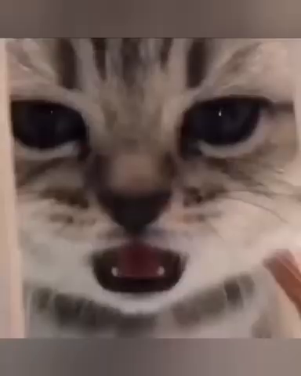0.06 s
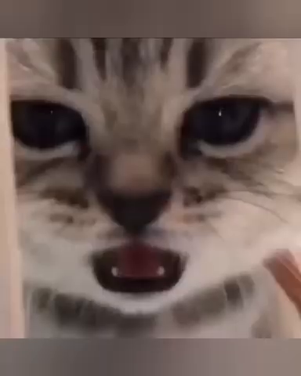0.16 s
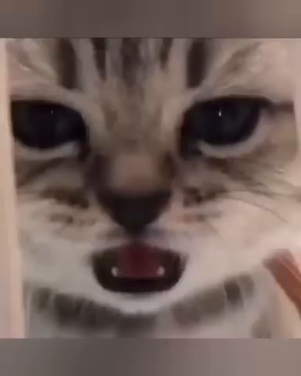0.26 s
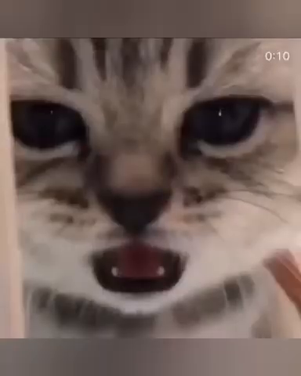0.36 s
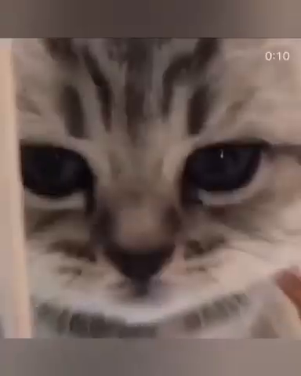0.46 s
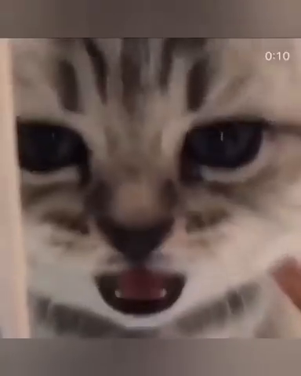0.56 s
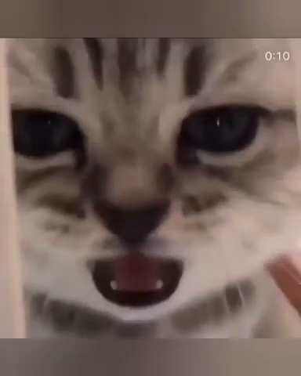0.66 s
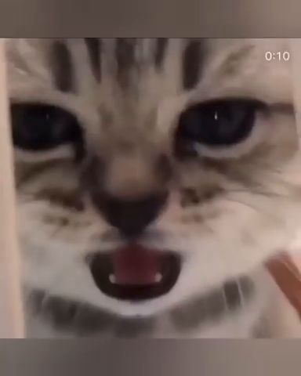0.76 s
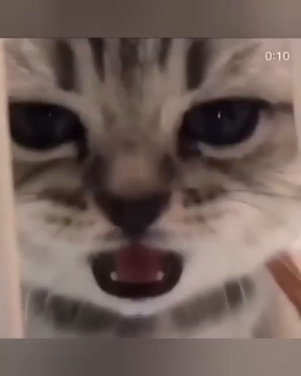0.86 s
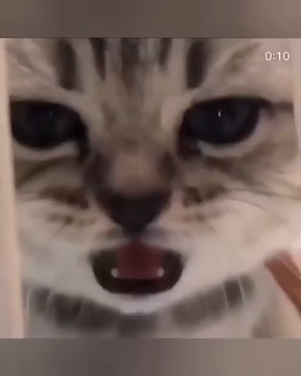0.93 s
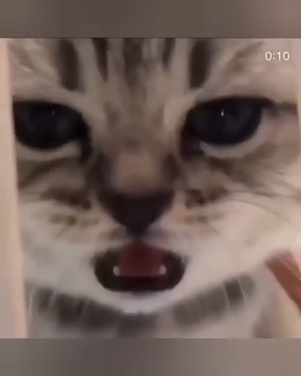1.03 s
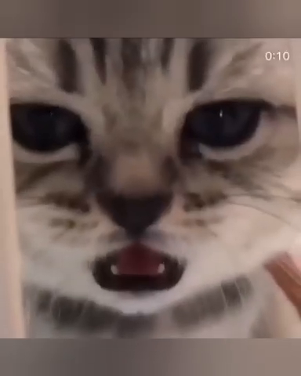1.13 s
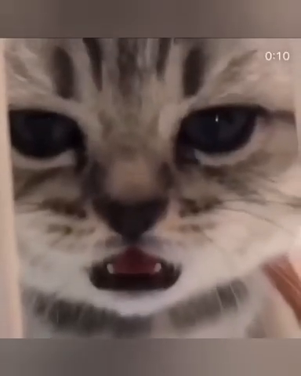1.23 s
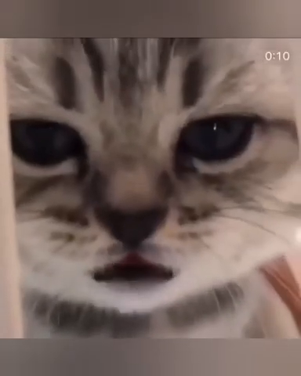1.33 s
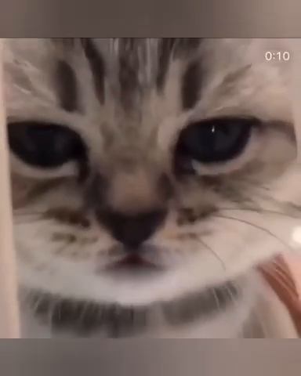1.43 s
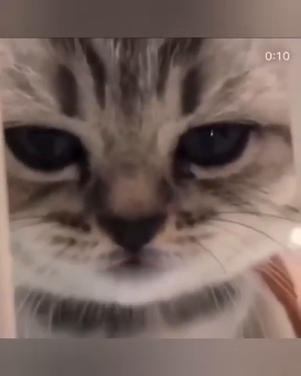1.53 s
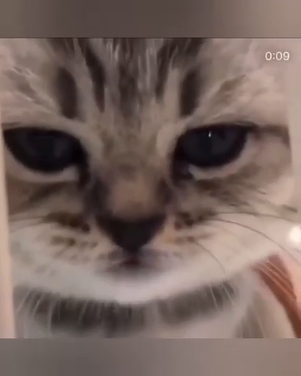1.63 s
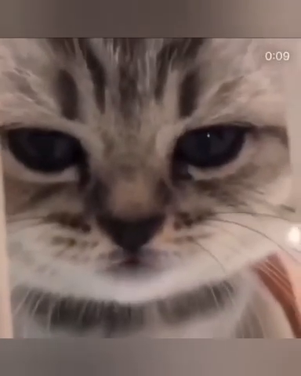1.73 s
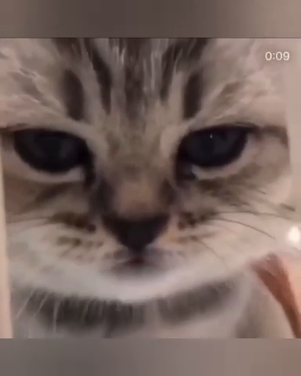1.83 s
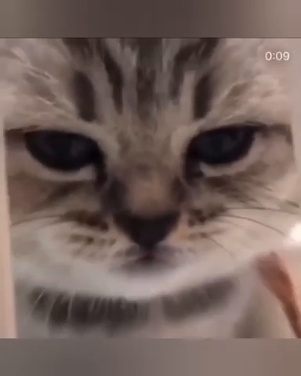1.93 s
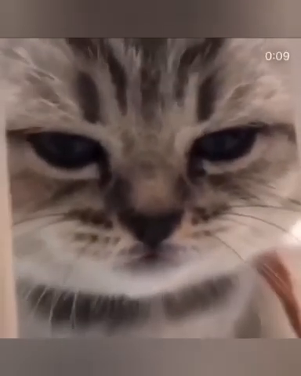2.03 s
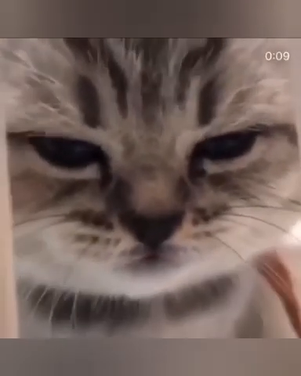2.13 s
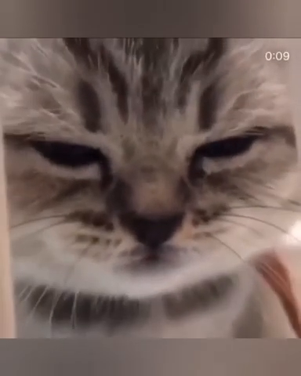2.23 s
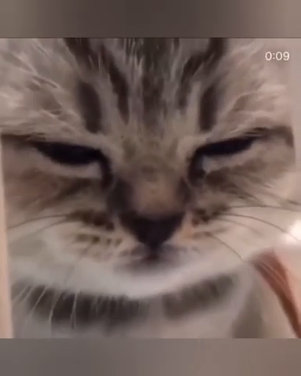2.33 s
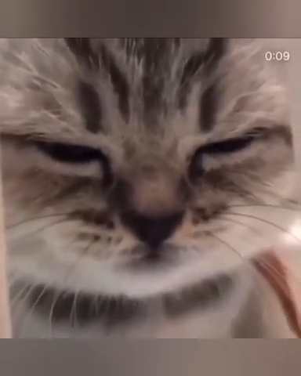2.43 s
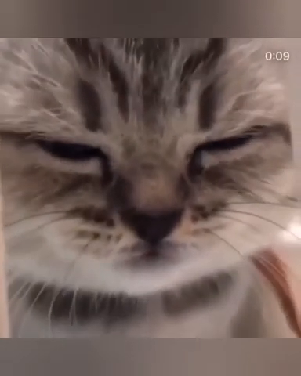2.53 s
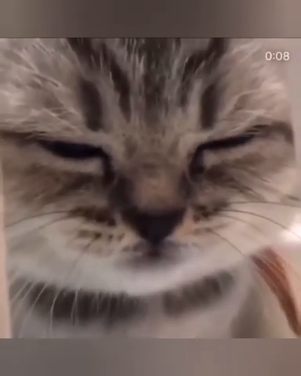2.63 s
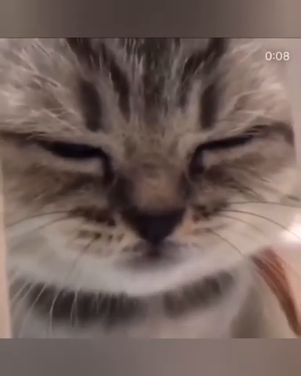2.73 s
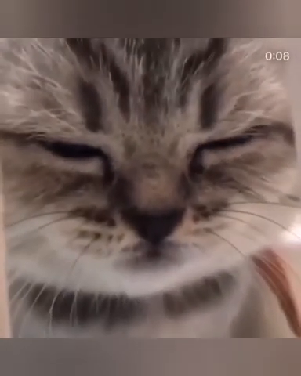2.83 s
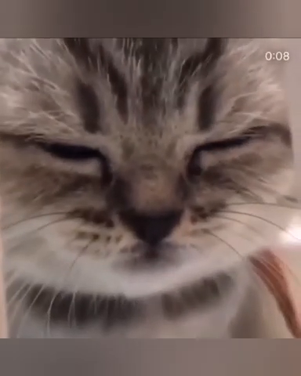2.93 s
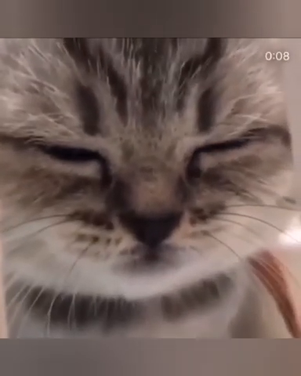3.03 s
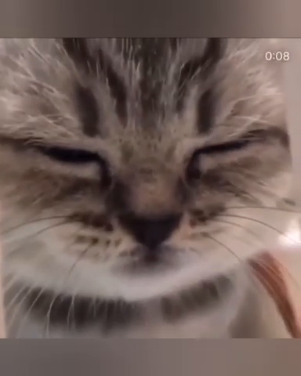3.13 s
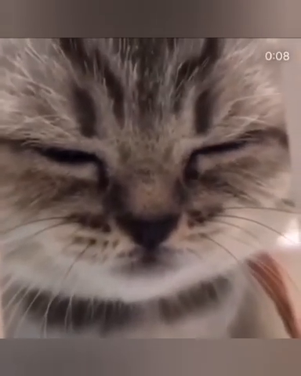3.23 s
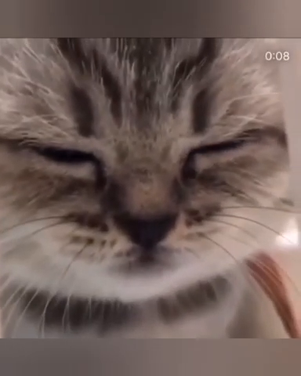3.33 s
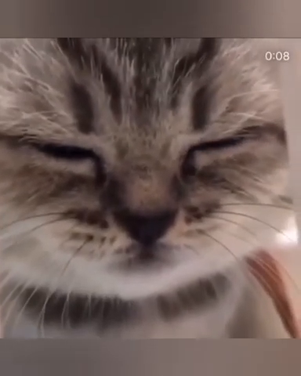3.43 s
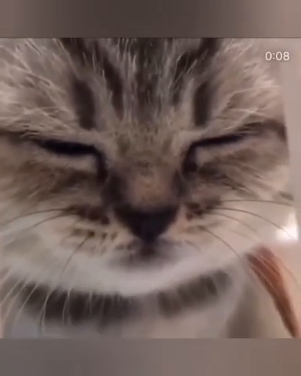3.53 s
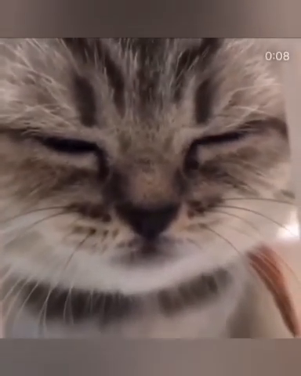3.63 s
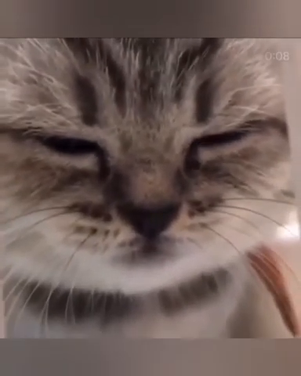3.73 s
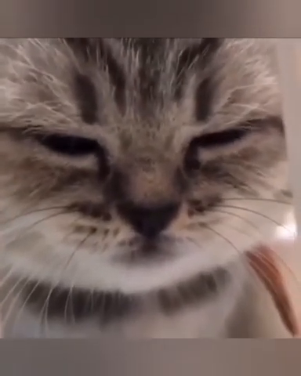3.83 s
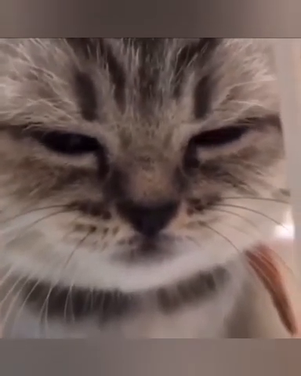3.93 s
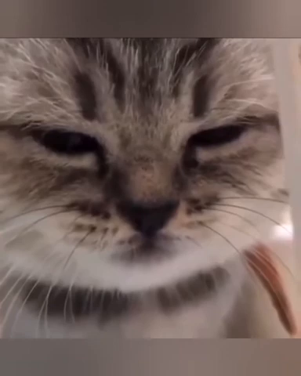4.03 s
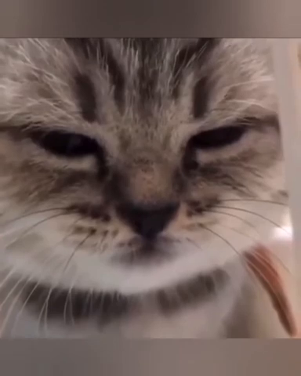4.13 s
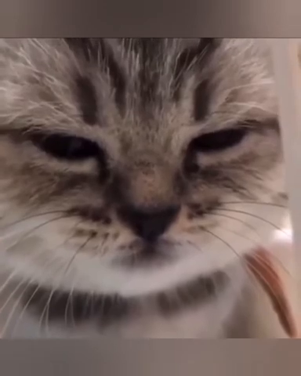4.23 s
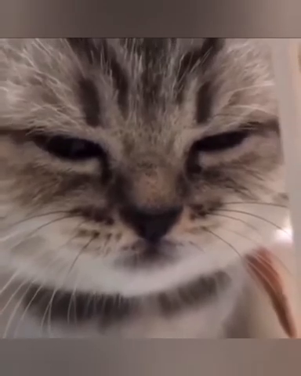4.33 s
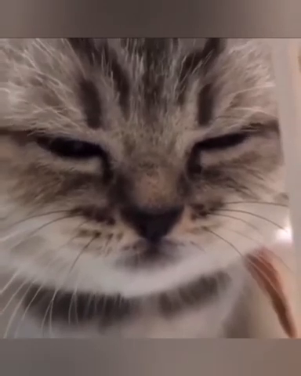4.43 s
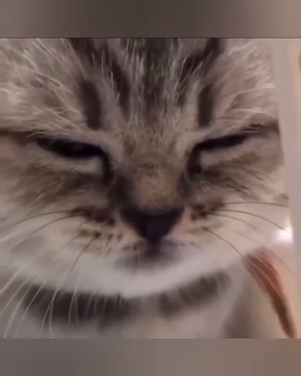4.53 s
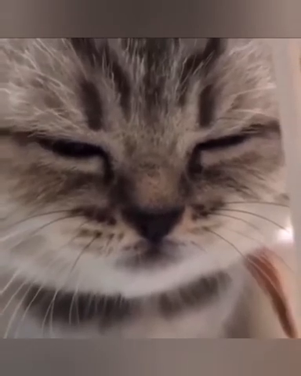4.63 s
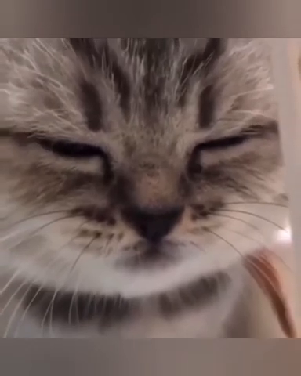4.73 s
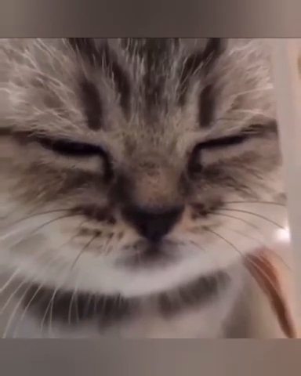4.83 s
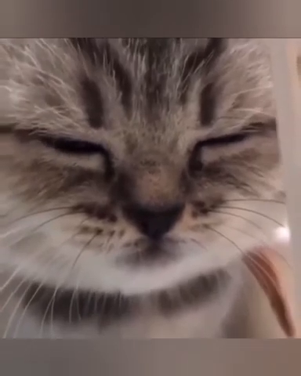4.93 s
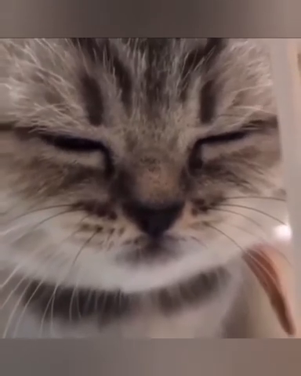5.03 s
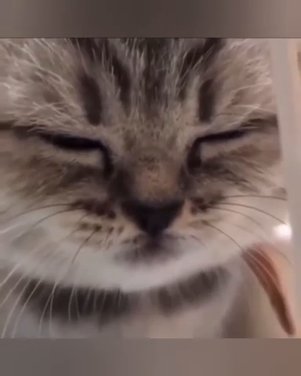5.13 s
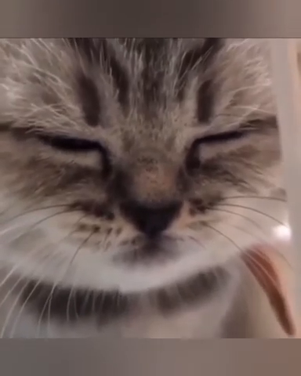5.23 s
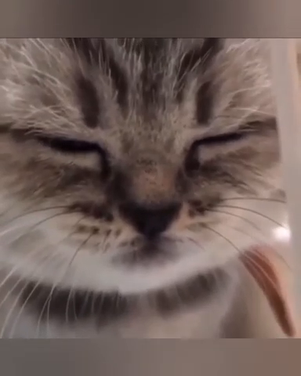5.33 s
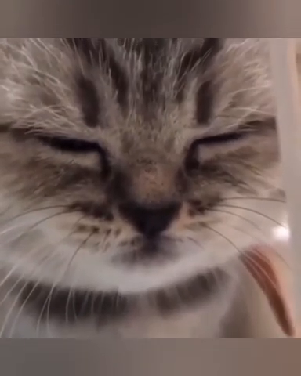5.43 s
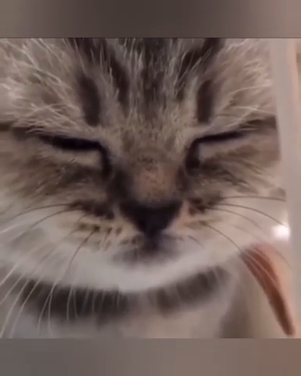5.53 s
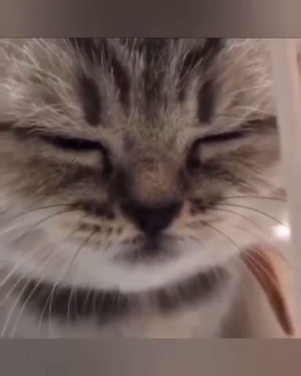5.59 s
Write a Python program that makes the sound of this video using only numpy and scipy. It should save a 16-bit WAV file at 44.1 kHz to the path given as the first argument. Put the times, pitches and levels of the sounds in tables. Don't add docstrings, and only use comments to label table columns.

```python
import sys
import numpy as np
from scipy import signal
from scipy.fft import rfft, irfft
from scipy.io import wavfile
from scipy.ndimage import uniform_filter1d, minimum_filter1d

SR = 44100
rng = np.random.default_rng(int(sys.argv[2]) if len(sys.argv) > 2 else 0)


def gain_from_db(level_db):
    decades = np.asarray(level_db, float) / 20
    return 10 ** decades


def digitize_waveform(pressure):
    field = np.atleast_2d(pressure).T
    bounded = np.clip(field, -1, 1)
    quanta = np.round(bounded * 32767).astype(np.int16)
    wavfile.write(sys.argv[1], SR, quanta)


N = 249606
SWITCH_ON_S = 0.5615

# time_s, pitch_hz, level_db, mouth_opening [about 0-1], effort_db [strength of high partials]
FIRST_MEW = [(.563, 1326, -37.5, 0.76, -18.5), (.605, 1266, -38.5, 0.42, -24.5),
             (.658, 1204, -38.5, .35, -32.5), (.673, 1193, -46, 0.93, -8.5), (.693, 1161, -40.5, 0.21, -30),
             (.893, 1121, -43, 0.48, -11.5), (.933, 1080, -46.5, .4, -32.5), (.988, 993, -45.5, 0.2, -44.5),
             (1.053, 674, -57, 0, -43)]
SECOND_MEW = [(.636, 926, -44, 0.35, -29), (.664, 1149, -37, 0.87, -4.5), (0.673, 1185, -40, 1.3, 3),
              (0.698, 1261, -36.5, 0.55, -3.5), (0.835, 1362, -33.5, 0.59, -4),
              (0.984, 1312, -36.5, 0.46, -4), (1.153, 1169, -36, 0.37, -6), (1.269, 1006, -39, 0.41, -17.5),
              (1.31, 883, -40.5, 0.42, -34.5)]
SECOND_SQUEAK = [
    (1.315, 874, -41.5, 0.13, -31),
    (1.347, 1165, -44.5, 0.15, -9.5),
    (1.365, 1200, -40, .1, 21),
]
THIRD_CROAK = [
    (1.535, 613, -67, 0.033, -25),
    (1.557, 619, -52, 0.058, -16),
    (1.58, 652.6, -54, 0.12, -10),
]
THIRD_MEW = [(1.606, 921, -63, 0.24, -16), (1.63, 1048, -59, 0.27, -1.5), (1.685, 1239, -56, 0.74, -6.5),
             (1.759, 1311, -50.5, 0.86, -6.5), (1.812, 1293, -49.5, 0.88, -12.5),
             (1.924, 1156, -57, 0.58, -12.5), (2.075, 1075, -52, 0.3, -21.5),
             (2.232, 941, -57.5, 0.32, -16.5)]
THIRD_SWELL = [(2.38, 978, -56, 0.37, -15), (2.488, 1054, -52, 0.47, -20.5),
               (2.538, 1112, -50.5, 0.66, -18.5), (2.687, 1075, -52, 0.65, -6.5),
               (2.905, 1051, -50.5, 0.62, -7.5), (2.961, 966, -54.5, 0.5, -12), (2.99, 904, -57, 0.28, -8),
               (3.016, 791, -57, 0.32, -2), (3.048, 612, -52, -0.59, -21)]
FOURTH_MEW = [(3.472, 595.5, -55.5, 0.16, -14), (3.526, 885, -57.5, 0.28, -8), (3.549, 1043, -55.5, .6, -1),
              (3.59, 1141, -54, 0.77, -2.5), (3.648, 1210, -51.5, .7, -2.5),
              (3.782, 1135, -46.5, 0.88, -12), (3.982, 1089, -53.5, 0.7, -7.5), (4.034, 953, -60, 0.26, -3),
              (4.088, 706, -54.5, -0.2, -11.5)]
FIFTH_CROAK = [
    (4.645, 421.5, -54, .05, -21),
    (4.673, 535, -48.5, .15, -8.5),
    (4.683, 632, -49, .2, -5.5),
    (4.702, 601.5, -52, 0.23, 0.5),
    (4.712, 727, -67, .02, -1),
]
FIFTH_MEW = [(4.727, 952, -59, .1, 4), (4.768, 1074, -58.5, 0.5, 2), (4.844, 1179, -54.5, 0.72, 0.5),
             (4.91, 1187, -52.5, 0.67, -7.5), (4.965, 1152, -51, 0.73, -9), (5.131, 1100, -53, 0.65, -10.5),
             (5.46, 1017, -53, 0.57, -9.5), (5.579, 963, -54, 0.46, -8), (5.655, 880, -58, 0.34, -3)]
MEWS = (FIRST_MEW, SECOND_MEW + SECOND_SQUEAK, THIRD_CROAK + THIRD_MEW + THIRD_SWELL,
        FOURTH_MEW, FIFTH_CROAK + FIFTH_MEW)


def mew(rows):
    # pitch_hz, level_db
    mouth = [(2500, 6), (3600, 12), (4500, -2.5), (5700, 5), (6600, -1.5), (7400, -11.5), (8200, -8),
             (9200, -30.5), (10500, -13.5), (12000, -14), (13500, -14.5)]
    time_s, *columns = np.transpose(rows)
    t = np.arange(time_s[0], time_s[-1], 1 / SR)
    hz, *controls = (uniform_filter1d(np.interp(t, time_s, column), 300) for column in columns)
    hz = uniform_filter1d(hz, size=600)
    first_db, second_db, third_db, high_db = partials_db(hz, *controls)
    high_db = np.minimum(high_db, np.maximum(second_db, third_db) + 8)

    glide = uniform_filter1d(abs(np.gradient(np.log(hz))) * SR, 900)
    glide = np.minimum(glide, 6)
    jitter = (0.002 + 0.002 * glide) * drift(len(t), 300)
    wobble = 0.0041 * drift(len(t), 40)
    turns = np.cumsum(hz * (1 + wobble + jitter)) / SR

    order = np.arange(4, 19)[:, None]
    slack_db = 2.1 * np.clip((950 - hz) / 300, 0, 1) + 0.32 * glide
    high = gain_from_db(read(mouth, order * hz) - slack_db * order)
    high *= order * hz < 13400
    high *= gain_from_db(high_db) / np.sqrt((high ** 2).sum(0))

    size = np.vstack([gain_from_db(first_db), gain_from_db(second_db), gain_from_db(third_db), high])
    shimmer = np.array([gain_from_db(1.9 * drift(len(t), 25)) for _ in size])
    phase = 2 * np.pi * (np.arange(1, 19)[:, None] * turns + 0.38 * rng.random((18, 1)))
    tone = np.sqrt(2) * (size * shimmer * np.cos(phase)).sum(0)
    rise_s = 0.002 if time_s[0] < SWITCH_ON_S + 0.01 else 0.012
    fade = np.minimum((t - time_s[0]) / rise_s, (time_s[-1] - t) / 0.012)
    return time_s[0], tone * np.clip(fade, 0, 1)


def partials_db(hz, level_db, opening, effort_db):
    throat_hz = 1000 + 2500 * opening
    climb = np.minimum(throat_hz / hz, 3.2) - 2.25
    nose_db = 8 * np.exp(-((2 * hz - 1250) / 170) ** 2)
    second_db = 1 + 8.5 * climb + nose_db
    third_db = -3.5 + 27.5 * climb
    low_db = np.array([0 * hz, second_db, third_db])
    low_db = low_db + level_db - 10 * np.log10((gain_from_db(low_db) ** 2).sum(0))
    return (*low_db, level_db + effort_db)


def breath():
    # pitch_hz, level_db [dB per Hz]
    air_colour = [(400, -41.5), (1000, -2), (2000, 0), (3200, 3.5), (5000, 0.5), (7000, 0), (9000, -5),
                  (11500, -0.5), (13500, -46.5)]
    level_db, hz = air_flow(np.arange(N) / SR)
    air = coloured(N, air_colour)
    fizz = signal.sosfilt(signal.butter(4, 7500, "high", fs=SR, output="sos"), air)
    air = air + fizz * (gain_from_db(7.3 * drift(N, 29)) - 1)

    turn = np.exp(2j * np.pi * np.cumsum(hz) / SR)
    r = np.exp(-np.pi * 900 / SR)
    whistle = 2 * (turn * signal.lfilter([1 - r], [1, -r], air / turn)).real
    flicker_db = 2.2 * drift(N, 90)
    return gain_from_db(level_db + flicker_db) * evened(air + 2.0 * whistle)


def air_flow(t):
    # peak_s, rise_db_per_s, fall_db_per_s, level_db, resonance_hz
    puffs = [(.6, 159.5, 124, -50.5, 3760), (.666, 92, 195, -44.5, 6350), (1.359, 907, 252, -47, 5340),
             (.95, 40, 18.5, -57, 5510), (1.67, 152, 300, -63, 5670), (2.49, 47.5, 126, -69.5, 5690),
             (2.921, 138, 96, -70, 5890), (3.04, 202, 401, -70.5, 5500), (3.537, 265, 124.5, -60, 6000),
             (4.069, 201, 220.5, -72, 4510), (4.678, 897, 147.5, -60.5, 5000),
             (4.744, 250, 148.5, -64, 6500)]
    # start_s, length_s, level_db, resonance_hz
    sniffs = [
        (1.471, 0.037, -39.5, 7030),
        (3.368, .07, -63.5, 2690),
    ]
    parts = []
    for rows in MEWS:
        time_s, _, level_db, *_ = np.transpose(rows)
        leak_db = -28 + np.interp(t, time_s, level_db, left=-140, right=-140)
        parts.append((leak_db, 5500))
    for peak_s, rise, fall, level_db, hz in puffs:
        drop_db = np.maximum(rise * (peak_s - t), fall * (t - peak_s))
        parts.append((level_db - drop_db, hz))
    for start_s, length_s, level_db, hz in sniffs:
        fall_db = 136 * (t - start_s) + 2200 * np.maximum(t - start_s - length_s, 0)
        parts.append((level_db - np.maximum(3000 * (start_s - t), fall_db), hz))
    power = np.array([gain_from_db(np.maximum(db, -140)) ** 2 for db, _ in parts])
    total = power.sum(0)
    return 10 * np.log10(total), np.array([hz for _, hz in parts]) @ power / total


def knock(start_s, peak_db, hz, bright_db, crack_db):
    # pitch_hz, level_db, t60_s [time to die by 60 dB]
    upper_modes = [(4153, -8, 0.0081), (5643, 1, 0.0031), (7730, -24.5, 0.025), (10250, -22.5, 0.014),
                   (11200, -29, 0.015)]
    # pitch_hz, level_db [dB per Hz]
    crack_colour = [(150, -25.5), (500, 5.5), (2000, 2), (6000, -4.5), (13000, -17)]
    t = np.arange(2500) / SR
    t60 = 0.0016 + 9.9 / hz
    ring = gain_from_db(-60 * t / t60) * np.sin(2 * np.pi * hz * t)
    for mode_hz, mode_db, mode_t60 in upper_modes:
        ring += gain_from_db(bright_db + mode_db - 60 * t / mode_t60) * np.sin(2 * np.pi * mode_hz * t)
    ring += gain_from_db(crack_db - 60 * t / (1.8 * t60)) * coloured(len(t), crack_colour)
    ring *= (1 - np.exp(-t / 0.00082)) ** 2
    return start_s, gain_from_db(peak_db) * ring / abs(ring).max()


def room(x):
    # pitch_hz, t60_s
    echo_length = [(300, 0.3), (2000, 0.44), (8000, 0.46)]
    taps = np.zeros(SR // 2)
    at = np.arange(200, len(taps) - 20, 20)
    taps[at + rng.integers(0, 20, len(at))] = rng.choice([-1., 1.], len(at))
    hz, t, z = signal.stft(taps, SR, nperseg=256)
    t60 = np.clip(read(echo_length, hz), 0.05, 1)[:, None]
    tail = signal.istft(z * gain_from_db(-60 * t / t60), SR, nperseg=256)[1]
    return signal.fftconvolve(x, tail / np.linalg.norm(tail))[:N]


def hum():
    # pitch_hz, level_db [dB per Hz]
    hum_colour = [(20, -45.5), (36, -19), (48, -19.5), (66, -1.5), (100, -7), (137, -5.5), (200, -11),
                  (300, -13), (480, -19.5), (630, -19.5), (1200, -24.5), (3000, -36.5), (6400, -49.5),
                  (11000, -45.5)]
    t = np.arange(N) / SR
    level_db = -63.5 + 14 * np.clip(0.5 - (t - 1.53) / 0.041, 0, 1)
    level_db += 3 * np.exp(-((t - 2.85) / 0.45) ** 2)
    return gain_from_db(level_db + 2.4 * drift(N, 8.0)) * coloured(N, hum_colour)


def evened(x):
    return x / np.sqrt(np.mean(x ** 2) + 1e-20)


def read(points, hz):
    f, value = np.transpose(points)
    return np.interp(np.log(hz + 1), np.log(f + 1), value)


def drift(size, hz):
    span = int(SR / hz)
    return evened(uniform_filter1d(uniform_filter1d(rng.standard_normal(size), span), span))


def coloured(size, colour):
    hz = np.fft.rfftfreq(size, 1 / SR)
    return evened(irfft(rfft(rng.standard_normal(size)) * gain_from_db(read(colour, hz)), size))


def add(mix, start_s, sound):
    part = mix[round(start_s * SR):][:len(sound)]
    part += sound[:len(part)]


def band_mean(v, edges):
    widths = np.diff(edges, append=v.shape[1])
    return np.repeat(np.add.reduceat(v, edges, 1) / widths[:, None], widths, 1)


def peakiness(z, edges):
    power = abs(z) ** 2 + 1e-24
    return 10 * np.log10(band_mean(power, edges)) - band_mean(10 * np.log10(power), edges)


def nearby_max(v, size):
    return -minimum_filter1d(-v, size, axis=1)


def thin_out(x, flat_db, tonal_db, attack_db, swap_share):
    # pitch_hz, depth_db
    mask_depth = [(800, 36), (1600, 36.5), (3000, 33.5), (5000, 21.5), (8500, 20.5), (13000, 23.5)]
    frames = dict(window="cosine", nperseg=2048, noverlap=1024)
    z = signal.stft(x, **frames)[2]
    hiss = signal.stft(rng.standard_normal(x.shape), **frames)[2]
    noise_bin, copy_bin, top_bin, shift = 196, 384, 608, 352

    treble_db = 10 * np.log10((abs(z[:, noise_bin:top_bin]) ** 2).sum(1, keepdims=True) + 1e-24)
    jump_db = abs(np.diff(treble_db, prepend=0))
    steady = np.maximum(jump_db, np.roll(jump_db, -1, 2)) < attack_db

    wide = np.arange(0, 1024, 64)
    copied = np.roll(z, shift, 1)
    tonal = uniform_filter1d(peakiness(z, wide), size=5, axis=2)
    tonal = np.clip((tonal - 3) / tonal_db, 0, 0.98)
    filler = hiss[:1] * np.sqrt(band_mean(abs(copied) ** 2, wide) / band_mean(abs(hiss[:1]) ** 2, wide))
    copied = np.sqrt(tonal) * copied + np.sqrt(1 - tonal) * filler
    copied *= np.sqrt(band_mean(abs(z) ** 2, wide) / (band_mean(abs(copied) ** 2, wide) + 1e-24))
    z[:, copy_bin:] = np.where(steady, copied, z)[:, copy_bin:]

    edges = np.r_[0:96:8, 96:160:12, 160:240:20, 240:320:27, 320:1024:32]
    level_db = 10 * np.log10(band_mean(abs(z) ** 2 + 1e-24, edges))
    depth_db = read(mask_depth, np.fft.rfftfreq(2048, 1 / SR))[:, None]
    masked = steady & (level_db < nearby_max(level_db, size=61) - depth_db)

    draws = rng.random((len(edges), z.shape[2]))
    chosen = np.repeat(draws, np.diff(edges, append=1025), 0) < swap_share
    swap = steady & chosen & (nearby_max(peakiness(z, edges), size=41) < flat_db)
    swap[:, :noise_bin] = False
    hiss *= gain_from_db(level_db) / np.sqrt(band_mean(abs(hiss) ** 2, edges))
    z = np.where(swap, hiss, z) * ~masked
    z[:, top_bin:] *= ~steady & (treble_db > treble_db.max() - 9)
    return signal.istft(z, **frames)[1][:, :N]


def scene():
    # start_s, peak_db, lowest_mode_hz, brightness_db, crack_db
    knock_list = [
        (0.603, -33, 2520, 9, -0.5),
        (3.61, -38.5, 2403, 7, -26),
        (3.641, -23.5, 1230, 7, -7.5),
        (3.869, -27, 1846, -11, -6.5),
        (4.648, -45, 930, -30.5, -30.5),
        (5.295, -49.5, 494, -32, -8),
        (5.475, -45, 316, -29, -16),
    ]
    kitten, knocks = np.zeros(N), np.zeros(N)
    for rows in MEWS:
        add(kitten, *mew(rows))
    for row in knock_list:
        add(knocks, *knock(*row))
    echoes = room(gain_from_db(-12.5) * kitten + gain_from_db(-6.0) * knocks)
    mono = kitten + knocks + echoes + breath() + hum()
    return np.array([mono, mono])


def top_cut(x):
    return signal.sosfilt(signal.butter(12, 13900, fs=SR, output="sos"), x)


def record(dry):
    switched_on = np.clip((np.arange(N) / SR - SWITCH_ON_S) / 0.00062, 0, 1)
    thinned = thin_out(dry, flat_db=4.5, tonal_db=2.5, attack_db=6.5, swap_share=0.5)
    return top_cut(thinned * switched_on)


dry = scene()
out = record(dry)
digitize_waveform(out)
```